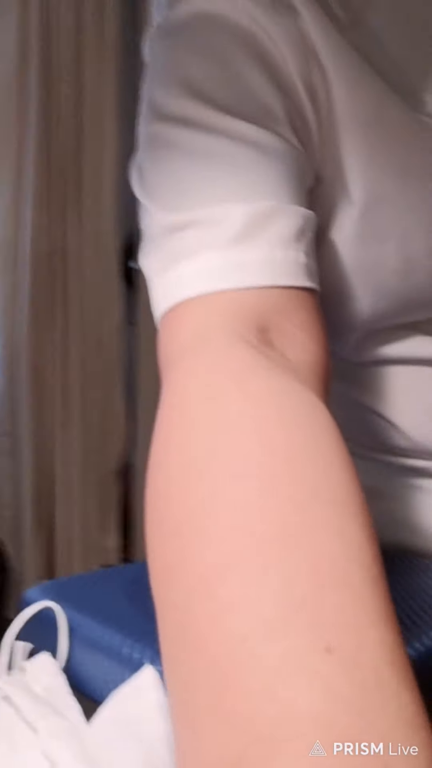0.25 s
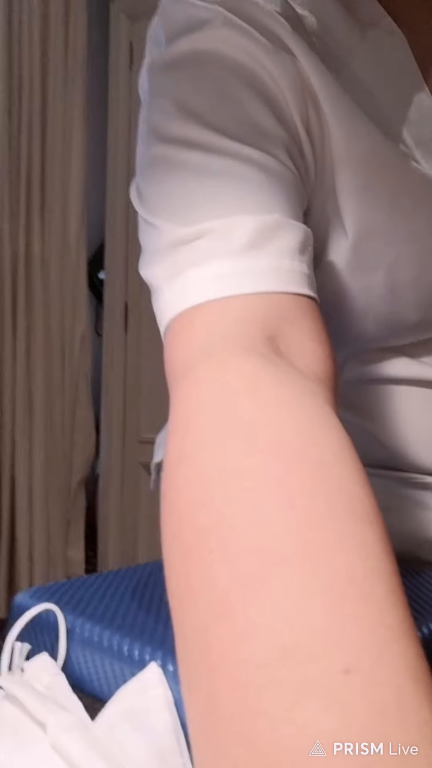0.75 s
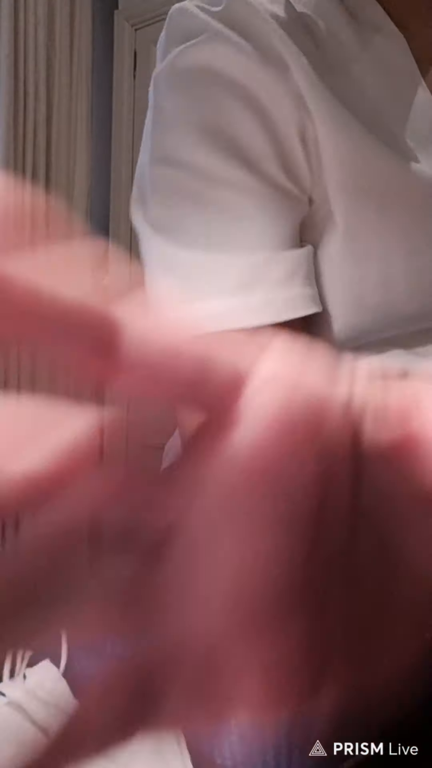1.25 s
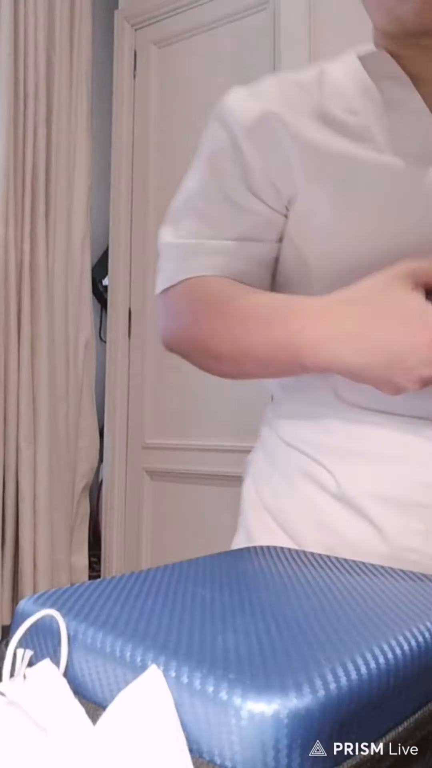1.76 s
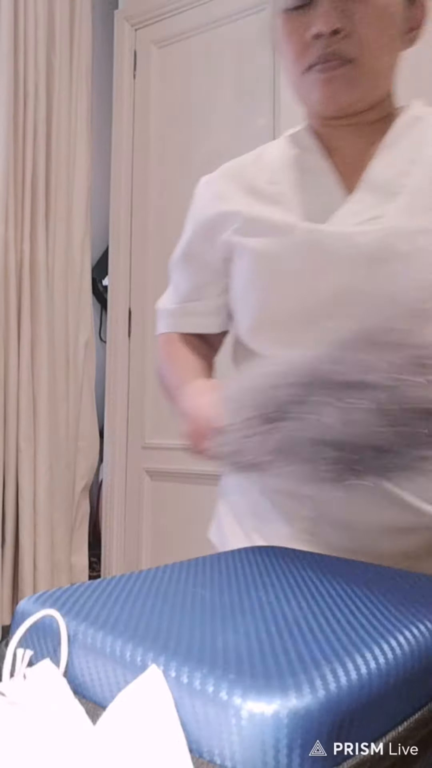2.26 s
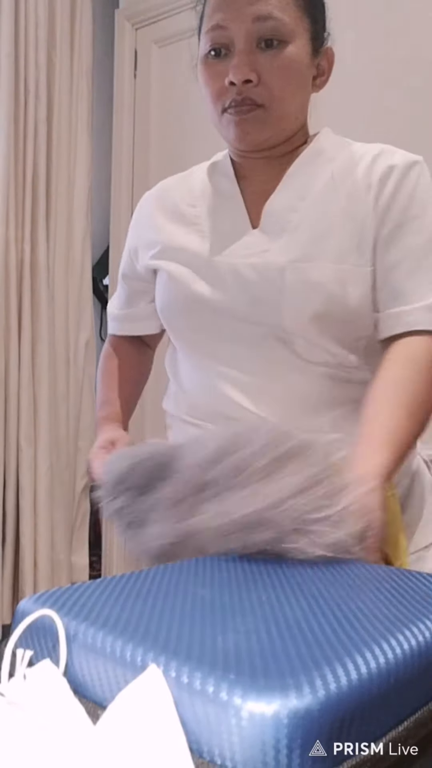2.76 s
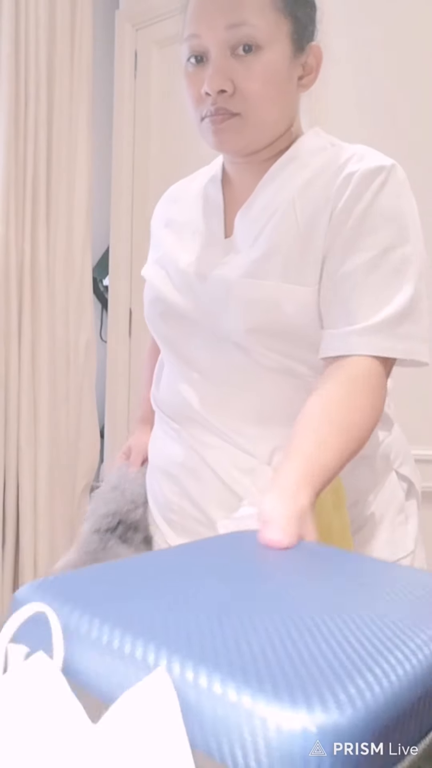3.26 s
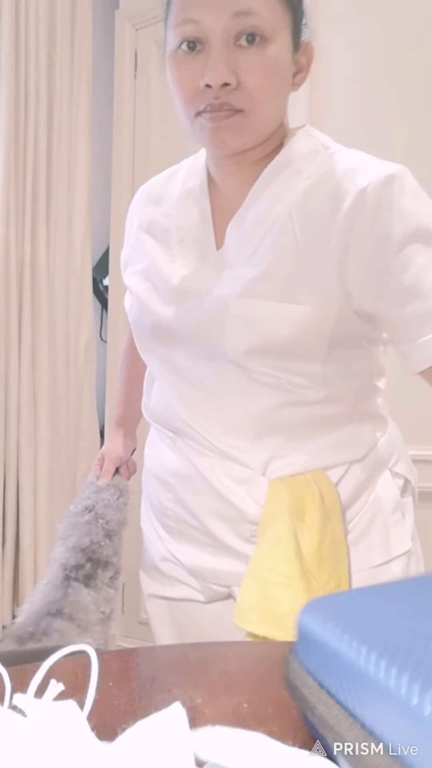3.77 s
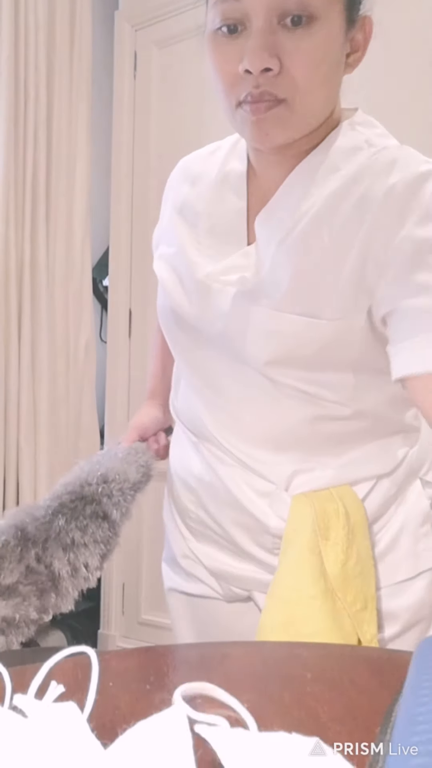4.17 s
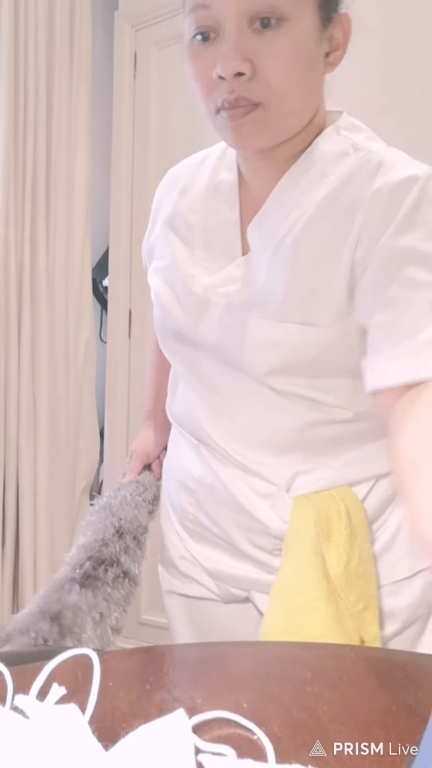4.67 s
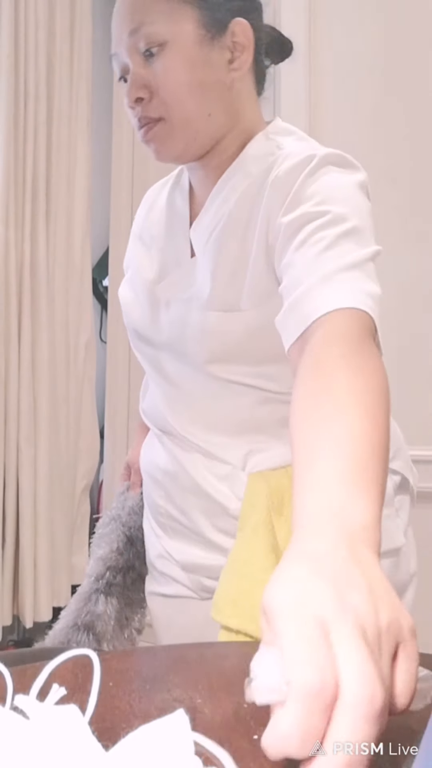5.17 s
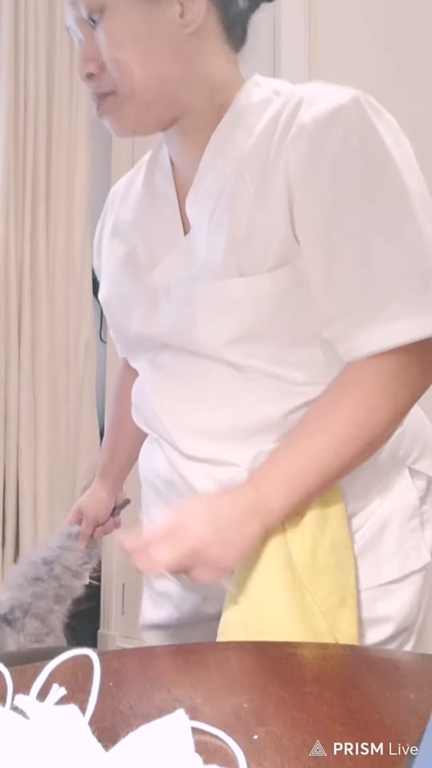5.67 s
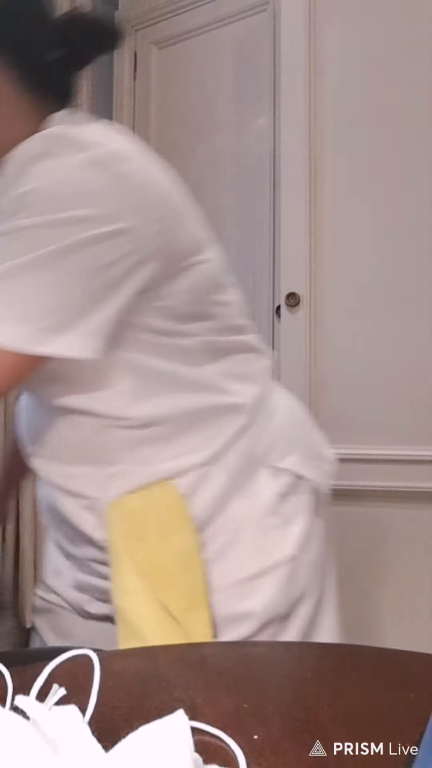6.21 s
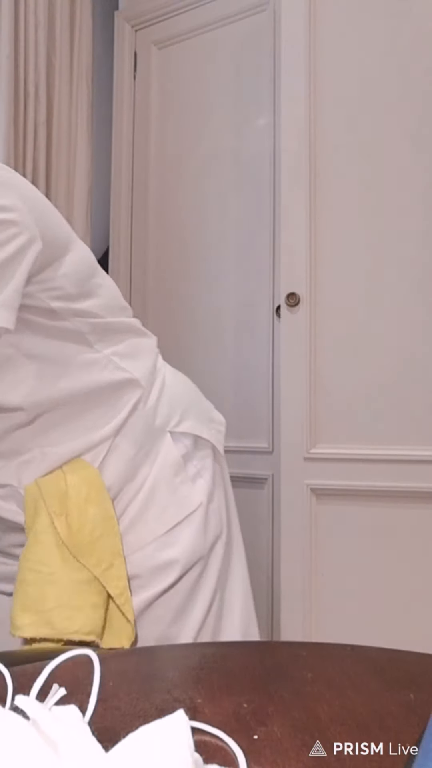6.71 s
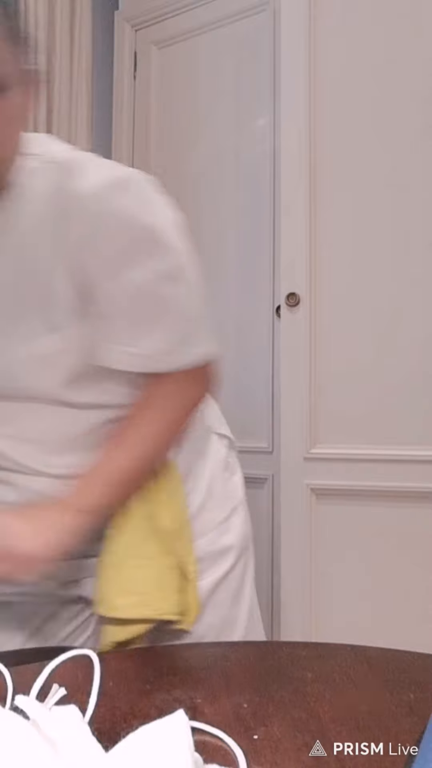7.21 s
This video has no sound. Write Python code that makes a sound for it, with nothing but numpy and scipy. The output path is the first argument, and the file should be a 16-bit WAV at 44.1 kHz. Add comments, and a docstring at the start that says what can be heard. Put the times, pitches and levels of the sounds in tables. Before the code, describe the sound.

Recorded very close by a phone in a small, dry furnished room. At about 0.14 s a huge dull bump nearly overloads, with a short metallic ring from the stand; low wobbling thuds, crisp finger rubbing and snaps follow, mostly left, until a firm knock at 0.72 and a last scuff near 0.8. From 0.9 to 1.9 s it is quiet, with tiny ticks around 1.2, 1.5 and 1.7. A soft feathery hiss swells at 2.0; at 2.5 a very sharp crack and woody knock strike, another at 2.6, a smaller one at 2.95. From 3.0 to 4.0 gentle swishes mix with hollow suitcase taps and ribbed crackling on the left. A clattery cluster of snaps and bumps comes at 4.1-4.6, then a table knock at 4.94. Soft fibrous strokes continue, swelling at 5.8 and 6.4 with faint low bumps, fading by 7.4.

```python
"""In a small furnished room, a phone on a metal stand is bumped and rubbed, close to its two microphone ports.
Then a feather duster and a cloth rustle over a hard suitcase, to the left, that is dragged off a wooden table.
Rustle and drag are shaped noise with crackling grains; knocks are damped modes pushed through the table;
snaps are short noise bursts; stand, table top and port ring as decaying sines. The room answers the hits."""
import sys
import numpy as np
from scipy import signal
from scipy.fft import rfft, irfft, next_fast_len
from scipy.io import wavfile
from scipy.ndimage import map_coordinates

SR = 44100
rng = np.random.default_rng(int(sys.argv[2]) if len(sys.argv) > 2 else 0)


def log_audio(samples):
    """Write samples as a 16-bit WAV file to the path given in sys.argv[1]."""
    # one column per channel
    frames = np.atleast_2d(samples).T
    # limit to full scale, then quantise
    limited = np.clip(frames, -1, 1)
    pcm = np.round(limited * 32767).astype(np.int16)
    wavfile.write(sys.argv[1], SR, pcm)


N = 328545

# Colour of fibre hiss, with the microphone port's peak: f/Hz, relative level/dB
HISS_COLOUR = [(1470, -34), (2500, -17.5), (5690, -9), (7470, -5), (8660, 0.5), (10500, -4.5), (15200, -10),
               (16000, -19.5)]
# Colour of the duller scrape: f/Hz, relative level/dB
SCRAPE_COLOUR = [(300, -33), (700, 2.5), (1200, 1.5), (2500, 0.5), (4500, -5), (7000, -27.5)]


def amp(db):
    """Gain of a level in dB."""
    return 10 ** (np.asarray(db) / 20)


def unit(x):
    """x at rms 1."""
    return x / np.sqrt(np.mean(x ** 2) + 1e-20)


def along(points, hz):
    """Reads (f/Hz, value) points on a log frequency axis."""
    f, value = np.transpose(points)
    return np.interp(np.log(hz + 1), np.log(f + 1), value)


def curves(rows):
    """One value per sample for each column after the time."""
    s, *columns = np.transpose(rows)
    return [np.interp(np.arange(N) / SR, s, column) for column in columns]


def wobble(rate):
    """A smooth random curve, rate knots a second."""
    knots = rng.standard_normal(int(N * rate / SR) + 4)
    return map_coordinates(knots, [np.arange(N) * rate / SR])


def filtered(x, response):
    """x times a complex response of frequency."""
    n = x.shape[-1]
    m = next_fast_len(n + 8192)  # spare length, so that tails do not wrap round
    return irfft(rfft(x, m) * response(np.fft.rfftfreq(m, 1 / SR)), m)[..., :n]


def panned(pan_db):
    """Left and right gains, pan_db apart (positive is left), whose mean is 1."""
    left = 2 / (1 + amp(-np.asarray(pan_db)))
    return np.array([left, 2 - left])


def add(track, s, sound):
    """Mixes a stereo sound in at time s."""
    i = round(s * SR)
    track[:, i:i + sound.shape[1]] += sound[:, :track.shape[1] - i]


def rub(spectrum, alike, rate, spiky_db):
    """Stereo friction noise of rms 1: tiny slips of uneven size; alike is the correlation of the ports."""
    slips = amp(spiky_db * wobble(rate)) * rng.standard_normal((2, N))
    turn = np.arccos(np.clip(alike, -1, 1)) / 2
    coloured = filtered(slips, lambda hz: amp(along(spectrum, hz)))
    mid, side = coloured * [[np.cos(turn)], [np.sin(turn)]]
    return unit(np.array([mid + side, mid - side]))


def room(x):
    """The room's answer is a noise tail in which each frequency dies at its own speed."""
    # Decay of the furnished room: f/Hz, time to fall 60 dB/s
    decay_times = [(200, 0.22), (450, 0.06), (10000, 0.016)]
    hz, t, z = signal.stft(rng.standard_normal((2, SR // 3)), SR, nperseg=256)
    fading = z * amp(-60 * t / along(decay_times, hz)[:, None])
    tail = signal.istft(fading, SR, nperseg=256)[1]
    return signal.fftconvolve(x, tail / np.linalg.norm(tail[0]), axes=1)[:, :N]


def drag():
    """The table hums under the movements, and the hollow case drones when it slides: slow, uneven friction."""
    # Course of the drag: t/s, table rumble level/dB, hollow shell level/dB
    drag_course = [(0.0, -54, -56.5), (0.31, -45.5, -52.5), (1.0, -62, -66.5), (2.8, -62, -68.5),
                   (4.54, -57.5, -59.5), (4.73, -62.5, -67.5), (6.1, -63, -69.5), (6.75, -58.5, -57),
                   (7.45, -67.5, -74.5)]
    # Colour of the hollow shell: f/Hz, relative level/dB
    shell_colour = [(90, -34), (200, 10), (430, -1), (750, -9), (1300, -22.5)]
    # Colour of the table's rumble: f/Hz, relative level/dB
    rumble_colour = [(12, -15.5), (30, 5), (80, 4), (180, -5), (350, -43)]
    rumble_db, shell_db = curves(drag_course)
    table = amp(rumble_db) * rub(rumble_colour, alike=0.93, rate=18, spiky_db=4.0)
    shell = rub(shell_colour, alike=0.87, rate=25, spiky_db=2.5)
    return table + amp(shell_db) * shell


def thumps():
    """The table top swings a few slow cycles and shakes the left port more, the right out of step."""
    # Swings after heavy contacts: t/s, level before rise, decay and pan/dB, f/Hz
    table_swings = [(0.219, -24, 87), (0.394, -20.5, 94.5), (0.588, -26.5, 67.6), (0.724, -24.5, 95),
                    (0.999, -40, 68), (2.491, -24, 42.5), (2.618, -18, 130), (2.941, -28.5, 44.8),
                    (3.659, -43, 36.7), (4.184, -29.5, 32.8), (4.461, -39.5, 57.7), (4.94, -30.5, 41),
                    (5.554, -43.5, 42)]
    out, t = np.zeros((2, N)), np.arange(SR // 3) / SR
    for s, db, hz in table_swings:
        swing = np.sin(2 * np.pi * hz * t - [[0], [1.4]])  # right port 1.4 rad behind
        swing = swing * np.minimum(t / 0.0034, 1)
        decay = amp(db - 60 * t * hz / 9)  # 60 dB in nine cycles
        add(out, s, decay * swing * panned(pan_db=5.5)[:, None])
    return out


def scuffs():
    """Skin or plastic judders over wood and sounds its hollow note, swelling and fading."""
    # Short scuffs of hand or shell: t/s, length/s, rms level at the top before pan/dB, hollow f/Hz
    wood_scuffs = [(0.816, 0.068, -54, 485), (2.495, 0.17, -44, 420), (4.144, 0.068, -47, 716),
                   (5.004, 0.11, -49.5, 680), (6.737, 0.061, -54, 630)]
    out = np.zeros((2, N))
    for s, length, db, hz in wood_scuffs:
        n = round(length * SR)
        judder = rng.standard_normal(n) ** 3  # spiky slips
        note = filtered(judder, lambda f: (1j * f / (hz * hz - f * f + 1j * f * 0.71 * hz)) ** 2)
        add(out, s, amp(db) * np.hanning(n) * unit(note) * panned(15)[:, None])
    return out


def stand():
    """The metal stand rings on at fixed pitches; hard blows wake its upper modes."""
    # Modes of the stand: f/Hz, level re the blow at zero hardness/dB, time to fall 60 dB/s
    stand_modes = [(735, 2, .07), (1238, 0, .36), (1491, -9, .4), (1852, -19, .35), (2250, -20, .35),
                   (2705, -22, .15)]
    # Blows: t/s, level/dB, hardness (tilt of the modes about 1 kHz)/dB per octave
    stand_blows = [(-.15, -35, 14.5), (.14, -28.5, -23), (.724, -49.5, -5), (4.94, -56, -37)]
    out, t = np.zeros((2, N)), np.arange(SR // 2) / SR
    for s, db, hard_db in stand_blows:
        ring = np.zeros(len(t))
        for hz, level, t60 in stand_modes:
            mode_db = level + hard_db * np.log2(hz / 1000)
            ring += amp(mode_db - 60 * t / t60) * np.sin(2 * np.pi * hz * t)
        already_past = round(max(-s, 0) * SR)  # the first blow fell just before the start
        add(out, max(s, 0), amp(db) * ring[None, already_past:])
    return out


def port_ring():
    """The first bump jolts the right microphone port, which whistles for a few milliseconds."""
    out, t = np.zeros((2, N)), np.arange(SR // 20) / SR
    whistle = amp(5 - 60 * t / 0.0056) * np.sin(2 * np.pi * 8400 * t)
    add(out, .1398, whistle * [[0], [1]])
    return out


def hollow(hz):
    """The air in the case sounds one note: a resonance with peak gain 1."""
    note_hz, width_hz = 430, 70
    return 1j * hz * width_hz / (note_hz ** 2 - hz * hz + 1j * hz * width_hz)


def crackle(rate, cycles):
    """Ribs of the shell catch and let go at random: short ringing grains, each at its own pitch, rms 1."""
    when, pitch, size = rng.random((3, int(rate * N / SR)))[..., None]
    turn = 500 * 6 ** pitch * np.arange(SR // 40) / SR  # cycles so far, at 500 to 3000 Hz
    envelope = turn * np.exp(-3 * turn / cycles)
    grains = size ** 7 * 2 ** pitch * np.sin(2 * np.pi * turn) * envelope  # few are large
    at = (when * N).astype(int) + np.arange(SR // 40)
    return unit(np.bincount(at.ravel(), grains.ravel())[:N])


def ticks():
    """Single fibres let go with a sharp click, a few much louder than the rest; rms 1."""
    ticks_a_second = 150
    when, size, side = rng.random((3, int(ticks_a_second * N / SR)))
    clicks = np.zeros((2, N))
    clicks[:, (when * N).astype(int)] = np.log(.03 + size) ** 2 * panned(12 * (side - .5))
    return unit(filtered(clicks, lambda hz: amp(1.4 * along(HISS_COLOUR, hz))))


def strokes():
    """Gains of hiss and scrape: every stroke of fingers, cloth or feathers swells to its top and fades."""
    # Strokes: t of the top/s, swell/s, fade/s, hiss gain at the top/dB, scrape gain at the top/dB
    stroke_rows = [(0.147, .02, 0.06, -42, -44), (.221, 0.018, 0.11, -31, -50.5),
                   (0.299, 0.079, .05, -37, -59), (0.378, 0.019, 0.18, -41, -63),
                   (0.438, 0.096, 0.083, -46.5, -52), (0.592, 0.028, 0.024, -42, -59),
                   (0.733, 0.0089, .055, -44, -44), (0.83, 0.031, 0.042, -37, -58.5),
                   (1.549, 0.194, 0.1, -52.5, -58.5), (2.042, 0.33, .45, -41.5, -60),
                   (2.49, 0.021, 0.17, -31.5, -47), (2.602, 0.095, 0.16, -35, -53),
                   (2.902, 0.4, 0.25, -46.5, -66.5), (2.965, 0.04, 0.25, -42, -53),
                   (3.236, 0.09, 0.1, -45.5, -53), (3.4, 0.08, 0.057, -50, -56),
                   (3.504, 0.236, 0.17, -42, -61.5), (3.74, 0.17, 0.082, -51, -56.5),
                   (3.9, 0.5, 0.76, -44.5, -63.5), (4.167, 0.15, 0.14, -44, -48),
                   (4.361, 0.028, 0.059, -36.5, -47.5), (4.564, 0.35, 0.25, -45, -54.5),
                   (4.975, 0.088, 0.28, -41, -59), (5.132, 0.43, 0.19, -47.5, -63),
                   (5.278, 0.084, 0.159, -49, -68.5), (5.53, 0.29, 0.23, -47, -61.5),
                   (5.793, 0.22, 0.28, -40, -60.5), (6.13, 0.11, .15, -60, -63.5),
                   (6.391, 0.16, 0.22, -40.5, -52), (6.575, 0.14, 0.3, -44.5, -56.5),
                   (6.77, .3, 0.81, -48, -59.5)]
    drop_db, roundness = 21, 0.95  # fall after one swell or fade time; above 1 the top is rounded
    rest_hiss_db, rest_scrape_db = -64, -75.5  # between strokes
    s, swell, fade, hiss_db, scrape_db = np.transpose(stroke_rows)[..., None]
    step = np.arange(0, N / SR, 1 / 1000)
    from_top = np.maximum((s - step) / swell, (step - s) / fade)
    shape = amp(-drop_db * from_top ** roundness)

    def gain(top_db, rest_db):
        """Adds the strokes and the rest level by power."""
        power = np.sum((amp(top_db) * shape) ** 2, axis=0) + amp(rest_db) ** 2
        return np.interp(np.arange(N) / SR, step, np.sqrt(power))

    return gain(hiss_db, rest_hiss_db), gain(scrape_db, rest_scrape_db)


def rustle():
    """Barbs and fibres slip in clumps: a hiss of shifting colour, a duller scrape, the ribbed shell's crackle."""
    phone_until_s, centred_from_s = .93, 6.05  # rubbing on the phone, then at the case, then central
    phone_pan_db = 13.5  # fingers rub by the left port
    case_pan_db, case_lead_s = 10, 0.00024  # the case stands to the left and reaches that port first
    shadow_hz = 9200  # above it the phone's body shades the far port
    split_hz = 9500  # below it the fuller barbs, above it the fine tips
    tick_db = -11  # re the hiss before its swings
    smooth_db, grains_db = 0.5, 2  # even rubbing and crackle, re the scrape gain
    grains_pan_db = 4  # on top of the pan of the case
    hiss_gain, scrape_gain = strokes()
    t = np.arange(N) / SR
    on_phone = t < phone_until_s

    fibres = rub(HISS_COLOUR, alike=0.1, rate=880, spiky_db=1.0)
    barbs = filtered(fibres, lambda hz: 1 / (1 + (hz / split_hz) ** 8))
    tips = fibres - barbs
    clumps_db = 1.5 * wobble(30)
    shifting = amp(1.6 * wobble(12)) * barbs + amp(1.5 * wobble(20)) * tips
    hiss = hiss_gain * amp(clumps_db) * (shifting + ~on_phone * amp(tick_db) * ticks())

    judder_db = 2.2 * wobble(90)
    scraping = rub(SCRAPE_COLOUR, alike=0.083, rate=200, spiky_db=0.5)
    scrape = scrape_gain * amp(judder_db + smooth_db) * scraping

    handled = np.interp(t, [2.4, 2.5, 4.7, 4.75], [0, 1, 1, 0])  # the case is touched and moved
    ribs = crackle(rate=800, cycles=2.2)
    hollow_ribs = unit(filtered(ribs, hollow))  # as strong as the ribs themselves
    grains = handled * scrape_gain * amp(grains_db) * (ribs + hollow_ribs)

    def from_case(hz):
        """Left port early, right late, with the right one shaded in the treble."""
        shade = panned(case_pan_db / (1 + (shadow_hz / (hz + 1)) ** 4))
        return shade * np.exp(1j * np.pi * hz * case_lead_s * np.array([[1], [-1]]))

    at_case = ~on_phone * np.clip(2 * (centred_from_s - t), 0, 1)  # lets go over half a second
    rubbed = (hiss + scrape) * panned(on_phone * phone_pan_db)
    beside = at_case * rubbed + grains * panned(grains_pan_db)[:, None]
    return (1 - at_case) * rubbed + filtered(beside, from_case)


def snaps():
    """Each snap is a burst of a few milliseconds: a bright crack and a duller tick."""
    # Snaps of quills, zip and nails: t/s, level before colouring/dB, left-right/dB,
    # tick re crack before colouring/dB
    snap_rows = [(0.2181, -18.5, 27, -30.5), (0.3668, -24.5, 24, -31), (0.442, -28.5, 13, 0.5),
                 (0.4574, -29, 16, -53), (0.5713, -35.5, 6, -30), (0.723, -20, -11, -9.5),
                 (1.239, -38.5, 8, -37), (1.5309, -36.5, -9, -11.5), (0.078, -42, 7, -10.5),
                 (1.713, -36.5, 9, -41), (2.4948, -17, 2.5, -20), (2.5153, -5.5, 9, -23),
                 (2.6177, -23.5, -16, -9.5), (2.946, -23.5, 7, -10), (3.0486, -28, 11, -25),
                 (4.117, -19.5, 10, -67), (4.163, -22.5, 6.5, -14), (4.2655, -32.5, 2.5, -14.5),
                 (4.334, -23.5, 1, -19.5), (0.108, -39, 1, -10), (0.285, -32.5, 13.5, -12.5),
                 (3.151, -43, -1, -3), (4.586, -24, 7, -20), (5.114, -33, 7.5, -37.5),
                 (5.145, -31.5, 5, -36), (5.324, -32.5, 2, -37)]
    crack, tick, t = np.zeros((2, N)), np.zeros((2, N)), np.arange(SR // 20) / SR
    for s, db, pan_db, tick_db in snap_rows:
        size = np.clip((db + 55.5) / 40, .1, 1)  # big snaps last longer
        decay = amp(db - 60 * t / (0.018 * size))
        rise = np.minimum(t / (0.00077 * size), 1)
        burst = decay * rise * panned(pan_db)[:, None] * rng.standard_normal((2, 2, len(t)))
        add(crack, s, burst[0])
        burst[1, :, 0] -= amp(db + 13.5) * panned(pan_db)  # the contact itself, one pulse in both ports
        add(tick, s, amp(tick_db - 60 * t / .009) * burst[1])

    def dull(hz):
        """Scrape colour, thinned in the bass and softened above 4 kHz."""
        return amp(along(SCRAPE_COLOUR, hz) + 17.5) * hz / (hz + 1500) / (1 + (hz / 4000) ** 2)

    bright = filtered(crack, lambda hz: amp(1.2 * along(HISS_COLOUR, hz) + 5.0))
    return bright + filtered(tick, dull)


def knocks():
    """A soft push swings one well damped mode and leaves a rattle, stronger for thin, high parts."""
    # Dull knocks on stand, shell and table: t/s, peak level before pan/dB, f/Hz
    knock_rows = [(0.078, -30, 420), (0.1363, 1, 263), (0.15, -3, 163), (0.225, -16.5, 151),
                  (0.263, -27.5, 172), (0.283, -26.5, 196), (0.393, -29.5, 148), (0.416, -30, 228),
                  (0.437, -27.5, 140), (0.464, -31, 212), (0.594, -27.5, 201), (0.648, -47.5, 517),
                  (0.721, -16, 257), (0.742, -32, 226), (0.754, -31, 110), (0.819, -38, 330),
                  (0.869, -40, 380), (1.53, -43.5, 450), (1.558, -42, 907), (2.492, -14, 406),
                  (2.617, -25, 274), (2.945, -29, 171), (3.149, -37.5, 685), (3.276, -44, 436),
                  (3.374, -41, 965), (3.504, -39, 1120), (3.578, -37, 507), (3.634, -44, 433),
                  (3.664, -36, 417), (3.72, -53, 850), (3.997, -48, 726), (4.1, -42, 300),
                  (4.147, -31, 300), (4.1541, -20.5, 850), (4.175, -27.5, 117), (4.194, -34.5, 480),
                  (4.263, -44, 480), (4.333, -28, 590), (4.455, -44, 430), (4.537, -32.5, 1060),
                  (4.551, -37, 690), (4.568, -32, 840), (4.586, -38.5, 407), (4.604, -42, 480),
                  (4.937, -27.5, 605), (6.357, -42.5, 171), (6.62, -38.5, 170), (6.642, -44, 260),
                  (6.783, -43, 150)]
    # Where the knocks come from: t/s, left-right level/dB
    knock_sides = [(.08, 2.5), (.22, 14.5), (.39, -0.5), (.72, -4.5), (1, 6), (3.2, 2.5), (3.5, 1),
                   (4.2, 6), (5, 7), (6, -0.5)]
    width_hz, hollow_db = 240, -5  # damping of the mode; air note of the case re the mode
    out, t = np.zeros((2, N)), np.arange(SR // 5) / SR
    for s, db, hz in knock_rows:
        pan_db = np.interp(s, *np.transpose(knock_sides))
        rattle = rng.standard_normal((3, len(t))) ** 3 / 4  # spiky: loose parts chatter
        mostly_shared = rattle[0] + 0.88 * rattle[1:]
        push = 0.028 * np.sqrt(hz / 400) * amp(-60 * t / 0.08) * mostly_shared
        push[:, 0] -= 1  # the blow itself, the same in both ports
        # the stand is nearer the right port, the case the left
        lag = np.array([[.0005], [0]] if s < 1 else [[0], [.00025]])
        on_case = 2.9 < s < 4.75

        def mode(f):
            """The struck part, with the air note when the case is hit."""
            struck = 1j * f * width_hz / (hz * hz - f * f + 1j * f * width_hz)
            return struck + on_case * amp(hollow_db) * hollow(f)

        def soft(f):
            """Padded contact takes time: treble is lost and the sound comes 1.8 ms on, plus the lag."""
            return np.exp(-2j * np.pi * f * (0.0018 + lag)) / (1 + 1j * f / (1.6 * hz)) ** 2

        body = filtered(push, lambda f: mode(f) * soft(f))
        add(out, s, panned(pan_db)[:, None] * amp(db) * body / np.abs(body).max())
    return out


def scene():
    """Hits with their room, over the rubbing sounds; knocks come mostly through the table, so stir it less."""
    dull, bright = knocks(), snaps()
    answer = room(amp(-12.5) * dull + amp(0.5) * bright)
    ringing = thumps() + stand() + port_ring()
    return dull + bright + answer + ringing + scuffs() + rustle() + drag()


def record(dry):
    """The microphone input rounds peaks off just below full scale and keeps nothing above its band limit."""
    top_hz = 15800
    clipped = dry / (1 + np.abs(dry / .98) ** 8) ** (1 / 8)
    return filtered(clipped, lambda hz: hz < top_hz)


dry = scene()
out = record(dry)
log_audio(out)
```